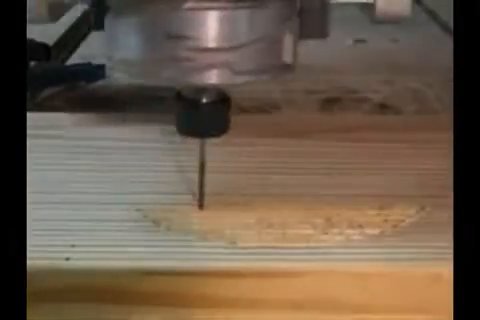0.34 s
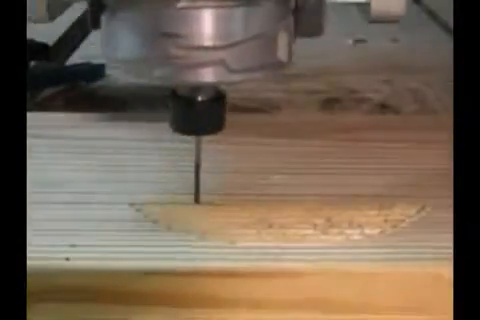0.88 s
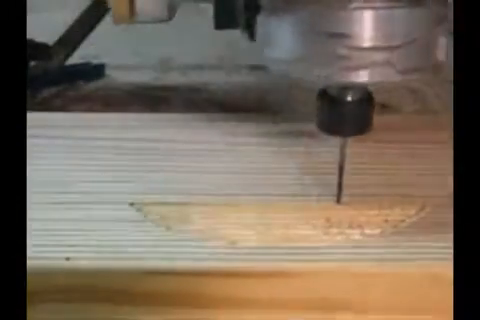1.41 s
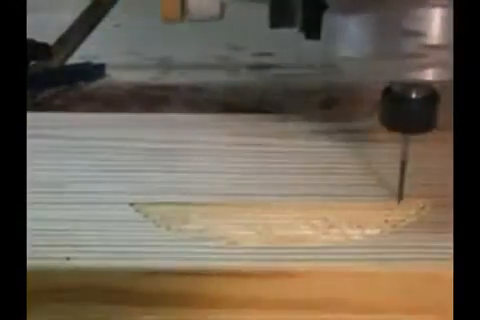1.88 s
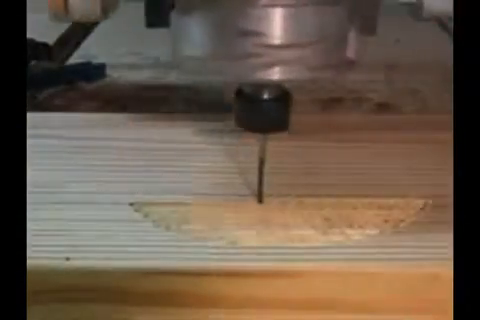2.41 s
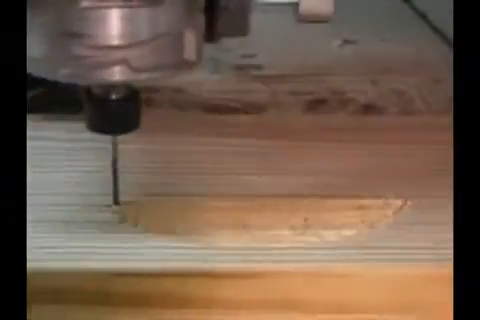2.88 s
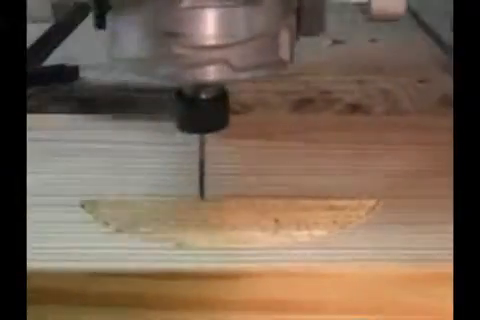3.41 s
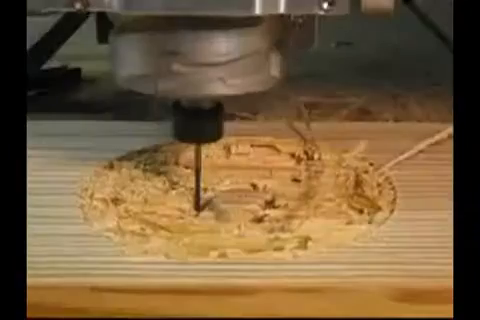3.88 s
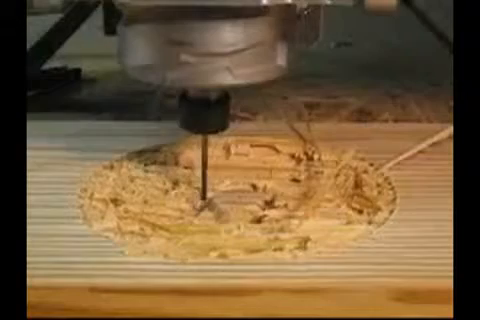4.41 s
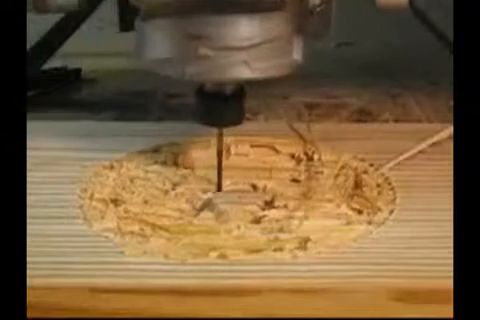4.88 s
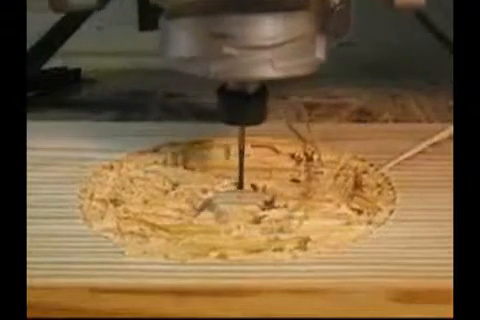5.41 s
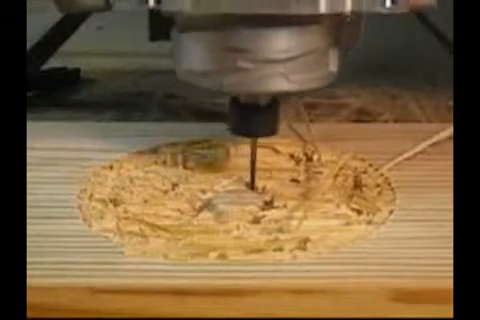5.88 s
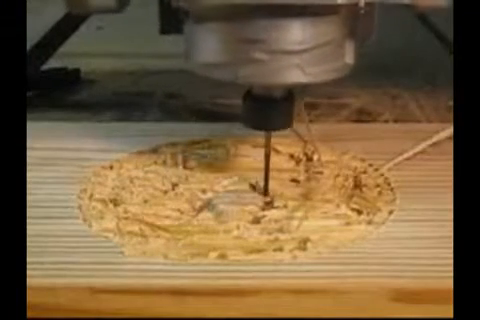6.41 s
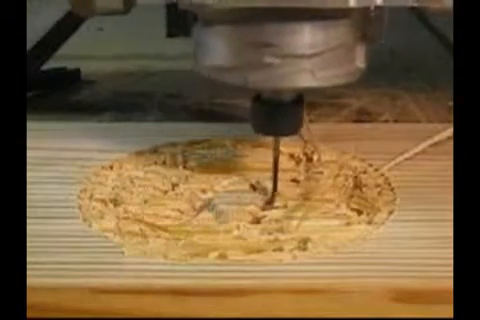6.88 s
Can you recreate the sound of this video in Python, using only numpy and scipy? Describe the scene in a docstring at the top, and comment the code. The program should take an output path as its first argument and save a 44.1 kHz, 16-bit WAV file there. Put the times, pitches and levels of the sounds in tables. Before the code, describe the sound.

High, airy motor whine close up, broken by a loud buzzing bite into wood and later another, before uneven rattling cuts and gliding motor tones.

```python
"""In a workshop, close to a stereo camera, a small router spindle whines over a wooden board.
The first pass runs mostly in free air, with two bursts of heavy bites, the second across the dissolve
and just after it. It dissolves into a later pass, in which the bit carves all the time and chatters.
Whine, rings and screech are sines on multiples (orders) of the shaft speed; fan, chips and bench are
shaped noise; the axis motors sing tones. The camera limits and clips softly."""
import sys
import numpy as np
from scipy import signal
from scipy.fft import rfft, irfft, next_fast_len
from scipy.io import wavfile
from scipy.ndimage import uniform_filter1d, minimum_filter1d, map_coordinates

SR = 44100
rng = np.random.default_rng(int(sys.argv[2]) if len(sys.argv) > 2 else 0)


def how_loud(loudness_db):
    """Turn decibels into a plain amplitude multiplier (0 dB gives 1, 20 dB gives 10)."""
    steps = np.asarray(loudness_db, float) / 20
    return 10 ** steps


def bounce(signal):
    """Save signal as a 16-bit WAV file at the path given by the first command-line argument."""
    frames = np.transpose(np.atleast_2d(signal))
    limited = np.clip(frames, -1, 1)
    pcm = np.round(limited * 32767).astype(np.int16)
    wavfile.write(sys.argv[1], SR, pcm)


N = 309141

# Start and end of the dissolve, in seconds.
DISSOLVE_S = (3.77, 3.9)
# Level of the motor sound over time; it sinks after loud cuts and creeps back. Each row: time in seconds, level
# in dB.
MOTOR_LOUDNESS = [(0, -1.1), (.97, -0.4), (1.02, -1.5), (1.3, -1), (1.6, -0.5), (2.1, -0.8), (2.4, -1),
                  (3.0, -0.84), (3.7, -0.5), (4.1, 1), (4.17, -3), (4.42, -3), (4.62, -5.5), (4.76, -2.5),
                  (5, -3.5), (5.3, -1), (5.8, -1.5), (6.0, -4), (6.08, -6), (6.17, -4.5), (6.25, -5.5),
                  (6.45, -5), (6.54, -8.5), (6.8, -3), (6.88, -6), (7.0, -5.5)]
# Whine of the spindle in either pass. Each row: shaft order, relative level in dB.
FIRST_WHINE_ORDERS = [(1, -37.0), (2, -35.0), (3, -40.0), (4, -44.0), (5, -42.0), (6, -56.0), (7, -48.0),
                      (9, -54.0), (10, -51.0), (11, -57.0), (12, -51.0), (14, -46.0), (15, -43.0),
                      (16, -46.0), (17, -41.0), (18, -47.0), (19, -40.0), (20, -50.0), (21, -38.0),
                      (22, -30.0), (23, -25.5), (24, -39.0), (25, -34.0), (26, -41.0), (28, -40.0),
                      (29, -41.0), (30, -40.0), (31, -44.0), (32, -35.0), (33, -47.0), (34, -56.0),
                      (35, -40.0), (36, -41.0), (37, -46.0), (38, -50.0), (39, -43.0), (40, -42.0),
                      (41, -53.0), (42, -50.0), (43, -47.0), (44, -46.0), (45, -43.0), (46, -55.0),
                      (47, -55.0), (48, -49.0), (49, -54.0), (50, -49.0), (51, -56.0), (52, -55.0)]
LATER_WHINE_ORDERS = [(1, -36.0), (2, -33.0), (4, -39.0), (5, -46), (6, -46), (7, -46), (8, -46), (9, -46),
                      (10, -53.0), (11, -46.0), (12, -47.0), (13, -49.0), (14, -46.0), (15, -47.0),
                      (17, -51.0), (18, -48.0), (19, -41.0), (20, -43.0), (21, -33.5), (22, -39.0),
                      (23, -29.0), (24, -33.0), (25, -37.0), (26, -37.0), (27, -36.0), (28, -37.0),
                      (29, -54.0), (30, -38.0), (31, -52.0), (32, -48.0), (33, -42.0), (34, -51.0),
                      (35, -50.0), (36, -54.0), (37, -42.0), (38, -52.0), (39, -44.0), (40, -52.0),
                      (42, -54.0), (44, -51.0), (45, -56.0), (46, -59.0), (47, -56.0), (48, -52.0),
                      (49, -58.0), (50, -57.0), (51, -58.0), (52, -57.0)]
# Tones of the axis drives. Each row: frequency in Hz, relative level in dB.
DRIVE_TONES = [(118.4, -56.5), (1003, -36.5), (1561, -38), (3235, -49), (3472, -38.5), (8748, -41),
               (12888, -55)]
# Colour of the fan rush in either pass. Each row: frequency in Hz, relative density in dB per Hz.
FIRST_FAN = [(150, -26), (350, -21), (480, -16), (700, -10), (1200, -8.5), (2000, -10.5), (3000, -10),
             (4300, -5), (5200, -5.5), (5800, 2), (6500, 1.5), (7500, 1.5), (8300, -5.5), (9500, -15),
             (12000, -21), (14500, -17.5), (15300, -78)]
LATER_FAN = [(150, -17), (350, -13), (480, -8), (700, -7), (1200, -3.5), (2000, -5), (3000, -7), (4300, -2),
             (5200, -1.5), (5800, 3.5), (6500, 3), (7500, 3), (8300, -4.5), (9500, -12), (12000, -16),
             (14500, -17), (15300, -14)]


def motor(first_hz, later_hz):
    """Both passes: shaft orders that sag under load, fan rush beating once a turn and drive tones."""
    loudness = how_loud(curves(MOTOR_LOUDNESS)[0])
    first, later = angle(first_hz), angle(later_hz)
    mix = curves([(DISSOLVE_S[0], 0), (DISSOLVE_S[1], 1)])[0]

    def sag(hz):
        return how_loud(-1.8 * (hz.max() - hz))  # dB lost for each Hz below the fastest turning

    # the low orders throb unevenly
    throb = stack([(2, -39), (3, -46)], first, 3, 16, 0.15, slip=3 * wobble(18))
    first_whine = sag(first_hz) * (stack(FIRST_WHINE_ORDERS, first, 1.6, 6, 0.25) + throb)
    later_whine = how_loud(1.0) * sag(later_hz) * stack(LATER_WHINE_ORDERS, later, 1.0, 12.0, 0.11)
    drives = stack(DRIVE_TONES, angle(np.ones(N)), 1.36, 8.9, 0.091)  # one turn a second: orders are Hz
    first_fan = how_loud(-16.5) * (1 + 0.067 * np.cos(first)) * rush(FIRST_FAN, patchy_db=1.32)
    later_fan = how_loud(-16) * (1 + 0.19 * np.cos(later)) * rush(LATER_FAN, patchy_db=1.4)
    first_pass = first_whine + np.sqrt(sag(first_hz)) * drives + first_fan
    later_pass = later_whine + how_loud(-3.5) * drives + later_fan
    return loudness * np.sqrt(1 - mix) * first_pass, loudness * np.sqrt(mix) * later_pass


# Torn wood fibres. Each row: frequency in Hz, relative density in dB per Hz.
CHIP_COLOUR = [(40, -30), (150, -19), (400, -18), (1200, -16), (2300, -7), (3200, -12), (4400, -13),
               (5700, -7), (6500, -9), (7500, 1), (8500, -13), (10000, -18), (14500, -28), (15400, -34)]


def bites(table, turn, rings, screech, rough_db, chips_db, beat, grip=1):
    """The flutes strike the wood every turn: board and bit ring, screech and torn fibres lie above."""
    *ring_sizes, screech_size = sizes(table, count=len(rings) + 1)
    ring = sum(size * stack(orders, turn, rough_db, 55, 0.27)
               for size, orders in zip(ring_sizes, rings))
    lines = how_loud(-5.0) * stack(screech, turn, rough_db + 0.5, 50, 0.26)
    chips_level = how_loud(chips_db + 0.51 * wobble(22)) * (1 + 0.084 * np.cos(turn))
    chips = chips_level * rush(CHIP_COLOUR, patchy_db=0.5)
    return grip * ring + screech_size * beat * (lines + chips)


# Heavy bites. Each row: start in seconds, length in seconds, levels in dB of the rings around orders
# 6, 7, 8, 10, 1-3, 17 and 21, level of the screech in dB, shaft sag in Hz.
HEAVY_BITES = [(.725, 0.024, -41, -31, -22, -23, -49, -40, -36, -20, 1),
               (.748, 0.027, -38, -34, -17, -16, -53, -34, -28, -13, 3.2),
               (0.774, 0.042, -30, -32, -14.5, -16, -34, -24, -30, -10, 4.8),
               (0.814, 0.03, -29, -32, -14, -17, -35, -22, -23, -10, 4),
               (0.851, 0.043, -35, -33, -15, -16, -35, -27, -25, -10, 4.5),
               (0.884, 0.041, -40, -38, -18, -18, -56, -30, -27, -9, 5.45),
               (.928, 0.025, -36, -30, -12, -25, -29, -25, -32, -8, 4.5),
               (.956, 0.023, -26, -20, -16.5, -31, -52, -22, -34, -10, 4),
               (.985, 0.092, -35, -28, -28, -35, -63, -44, -47, -33, 0.43),
               (1.085, 0.012, -22, -27, -23, -34, -54, -38, -36, -16, .4),
               (1.115, 0.27, -48, -39, -48, -53, -57, -50, -46, -29, 0.67),
               (3.801, .016, -19, -29, -26, -24, -28, -40, -34, -21, 3.9),
               (3.816, .074, -28, -40, -16.5, -20, -50, -34, -34, -10, 6.5),
               (3.909, 0.04, -25, -29, -17, -17, -33, -24, -31, -12.5, 5.2),
               (3.951, .028, -43, -32, -15, -21, -41, -32, -31, -8.5, 3.9),
               (3.979, 0.064, -37, -30, -14.5, -21.5, -34, -36, -28, -8.5, 1.77),
               (4.036, 0.033, -30, -22, -15, -28, -32, -17.5, -34, -7, 4.9),
               (4.066, .054, -23, -30, -30, -34, -37, -37, -42, -15.5, 4)]
# Orders that sound together, a group for each ring level. Each row of a group: order, relative dB.
HEAVY_RING_GROUPS = [
    [(5, -6), (6, 0)],
    [(7, 0)],
    [(8, 0), (9, -10)],
    [(10, 0), (11, -8), (12, -10)],
    [(1, 0), (2, -2), (3, 0)],
    [(14, -4), (17, 1.5)],
    [(13, -8), (15, -8), (16, -12), (18, -9), (19, -3), (20, -6), (21, 3), (22, -2)],
]
# Screech. Each row: shaft order, relative level in dB.
HEAVY_SCREECH = [(24, -14), (25, -29), (26, -1.5), (27, -4), (28, -2.5), (29, -7), (30, -10)]


def heavy_bites(turn):
    """Deep cuts ring on the low orders and screech, their rings shaken by the grain."""
    return bites(HEAVY_BITES, turn, HEAVY_RING_GROUPS, HEAVY_SCREECH,
                 rough_db=2.0, chips_db=1.0, beat=0.55, grip=grain())


# The bit lets go for an instant. Each row: time in seconds, gain at the deepest point in dB.
LETTING_GO = [(.746, -11), (.769, -14), (.814, -14), (0.847, -13), (.888, -6), (.927, -4), (3.9, -4),
              (3.942, -11), (4.09, -14)]


def grain():
    """Hard and soft grain of the wood shakes the rings, and now and then the bit lets go."""
    t = np.arange(N) / SR
    half_width_s = 0.0028  # where the dip in dB has shrunk to 1/e
    lapses_db = sum(db * np.exp(-((t - s) / half_width_s) ** 2) for s, db in LETTING_GO)
    return how_loud(0.74 * wobble(70) + lapses_db)


# Clean whistling inside heavy bites. Each row: start in seconds, length in seconds,
# level of order 27 in dB, level of order 28 in dB.
WHISTLES = [(.78, 0.028, -35, -34), (0.823, 0.037, -34, -25), (.875, 0.038, -27, -22),
            (0.927, 0.027, -28, -32), (3.825, 0.059, -26, -19), (3.907, 0.031, -18, -22),
            (3.978, 0.05, -9, -21), (4.04, 0.023, -22, -28)]


def whistle(turn):
    """Two neighbouring orders meet a sharp resonance of the bit and sound almost pure."""
    return sum(size * stack([(order, 0)], turn, 1.2, 30, 0.3)
               for size, order in zip(sizes(WHISTLES, count=2), (27, 28)))


# Shallow cuts. Each row: start in seconds, length in seconds, levels in dB of the rings around
# orders 5, 6, 8 and 9, level of the screech in dB, shaft sag in Hz (negative: it speeds up).
SHALLOW_CUTS = [(3.599, 0.2, -44, -37, -42, -50, -42, 1), (3.8, 0.12, -32, -22, -24, -25, -30, 0.5),
                (3.955, 0.071, -43, -37, -21, -17, -13, 1), (4.045, 0.037, -28, -23, -22, -38, -31, 0),
                (4.1, 0.0339, -28, -21, -29, -42, -46, 0), (4.148, 0.019, -25, -25, -27, -29, -44, -0.5),
                (4.205, 0.066, -30, -27, -32, -41, -50, 0), (4.29, 0.022, -34, -37, -24, -31, -42, 0.5),
                (4.35, 0.055, -31, -32, -33, -50, -49, -0.5), (4.402, 0.03, -32, -31, -21.5, -27, -24, 3),
                (4.463, 0.03, -31, -27, -19.5, -30, -19, 3.5),
                (4.496, 0.048, -34, -30, -26.5, -34, -23, 2.5), (4.56, 0.02, -42, -33, -29, -38, -26, 3),
                (4.589, 0.066, -40, -35, -49, -44, -47, 0), (4.68, 0.096, -53, -32.5, -37, -52, -46, 0),
                (4.76, 0.048, -34, -29, -37, -34, -42, 0), (4.8, 0.168, -31, -30, -37, -32, -39, 0.5),
                (4.971, 0.21, -40, -29.5, -33, -34, -41, 0), (5.17, 0.22, -41, -31, -32.5, -34, -46, -0.5),
                (5.4, 0.2, -51, -27.5, -52, -62, -35, 0), (5.62, 0.074, -45.5, -45, -62, -61, -48, -0.5),
                (5.72, 0.23, -39, -44.5, -45, -38.5, -33, 0),
                (5.925, 0.046, -53, -38, -42, -31, -23.5, 0.5),
                (6.011, 0.027, -34, -19, -29, -40, -25.5, 2),
                (6.034, 0.027, -33, -18, -37, -42, -18.5, 2.5), (6.155, 0.03, -44, -32, -34.5, -42, -32, 0),
                (6.185, 0.05, -26, -22.5, -29, -34, -23, 1.5), (6.24, 0.12, -27, -22, -34, -39.5, -49, 0.5),
                (6.36, 0.055, -25, -22.5, -42, -44.5, -44, 0), (6.411, 0.097, -25, -19, -34, -45, -31, 0),
                (6.551, 0.12, -46, -41, -49.5, -60, -48, 0.5),
                (6.701, 0.094, -47, -36.5, -43.5, -51.5, -44, -0.5),
                (6.781, 0.05, -38, -22, -17.5, -32, -17.5, 3), (6.83, 0.04, -24, -18, -24, -23, -15.5, 0.5),
                (6.912, 0.13, -27, -21.5, -29.5, -36, -33, 2.5)]
# Orders that sound together, a group for each ring level. Each row of a group: order, relative dB.
SHALLOW_RING_GROUPS = [
    [(5, 0)],
    [(6, 0), (11, -17), (12, -18), (13, -21), (17, -17), (18, -18)],
    [(7, -9), (8, 0), (10, -10), (16, -10)],
    [(9, 0)],
]
# Screech. Each row: shaft order, relative level in dB.
SHALLOW_SCREECH = [(13, -13), (14, -12), (15, -13), (16, -11), (17, -11), (18, -13), (21, -11), (23, -7),
                   (24, -4), (25, -4), (26, 0), (27, -2), (28, -10), (29, -9), (30, -10)]


def carving(turn, slip):
    """Shallow cuts ring and screech; the depth of cut swells with the chatter beat."""
    swing = sizes(CHATTER_SPELLS, count=2)[1] / (sizes(SHALLOW_CUTS, count=2)[1] + 1e-4)
    throb = 1 + np.minimum(swing, 0.8) * np.cos(slip)
    return bites(SHALLOW_CUTS, turn, SHALLOW_RING_GROUPS, SHALLOW_SCREECH,
                 rough_db=1.9, chips_db=-3, beat=throb)


# The third shaft order while carving. Each row: time in seconds, level in dB.
THIRD_ORDER_LEVEL = [(3.74, -80), (3.82, -28), (4.1, -35.5), (4.4, -35), (4.65, -42.5), (4.85, -35.5),
                     (5.2, -49), (5.7, -42.5), (7, -50)]


def third_order(turn):
    """A tone at three times the shaft speed rises and sinks while carving."""
    return how_loud(curves(THIRD_ORDER_LEVEL)[0]) * stack([(3, 0)], turn, 1.5, 20, 0.15)


# Spells of chatter. Each row: start in seconds, length in seconds, level of the low board ring in dB,
# of the board ring in dB and of the bit ring in dB, distance below the shaft orders in Hz.
CHATTER_SPELLS = [(3.797, 0.16, -27, -23.5, -31, 53), (3.975, 0.13, -42, -28, -27, 47),
                  (4.096, 0.1, -34, -29, -43, 44), (4.269, 0.088, -36, -28.5, -37, 43),
                  (4.355, 0.12, -42, -30.5, -29.5, 46), (4.543, 0.09, -34, -41, -31.5, 46),
                  (4.748, .05, -40, -46, -32, 50), (4.798, 0.09, -30, -29, -27.5, 52),
                  (4.893, .07, -34, -33, -26, 46), (4.959, 0.043, -44, -36, -39, 48),
                  (5.413, 0.21, -44, -35, -57, 45), (5.544, 0.18, -46.5, -32.5, -38, 45),
                  (5.721, 0.067, -38, -39.5, -30, 48), (5.785, 0.15, -26, -31, -27.5, 48),
                  (5.923, 0.074, -30, -38.5, -24.5, 45), (6.014, 0.062, -34, -27, -32, 40),
                  (6.179, 0.057, -26, -19, -35, 36), (6.239, 0.085, -32, -25, -42, 37),
                  (6.315, 0.09, -48, -34, -50, 38), (6.405, 0.13, -41, -30, -42, 38),
                  (6.704, 0.1, -44, -36, -40, 46), (6.779, 0.12, -40, -33, -33.5, 48),
                  (6.906, .12, -27, -23, -34, 46)]
# Orders that sound together, a group for each ring level. Each row of a group: order, relative dB.
CHATTER_RING_GROUPS = [
    [(4, -15), (5, -4)],
    [(6, 0)],
    [(7, -5), (8, 1), (9, -9.5), (10, -15)],
]
# Second harmonic of the chatter. Each row: shaft order it lies below, relative level in dB.
CHATTER_OVERTONE = [(13, -15.5), (14, -28), (15, -2), (16, -3.5), (17, -13), (18, -12), (21, -26), (24, 0),
                    (26, -17), (29, -23)]


def chatter(turn, slip):
    """The bit swings at its own frequency: lines below the orders beat with them.

    The overtone grows with the square of the swing."""
    ring_sizes = sizes(CHATTER_SPELLS, count=3)
    ring = sum(size * stack(orders, turn, 3, 55, 0.2, slip)
               for size, orders in zip(ring_sizes, CHATTER_RING_GROUPS))
    overtone = stack(CHATTER_OVERTONE, turn, 2.1, 30, 0.4, 2 * slip)
    return ring + how_loud(20.5) * ring_sizes[2] ** 2 * overtone


def slipping():
    """Phase by which the chatter trails the orders; every spell starts in a trough of the beat."""
    t = np.arange(N) / SR
    starts, hz = np.array(CHATTER_SPELLS)[:, [0, -1]].T
    spell = np.maximum(np.searchsorted(starts, t) - 1, 0)
    return np.pi + 2 * np.pi * hz[spell] * (t - starts[spell])


# Glides of the feed motors while carving. Each row: start in seconds, end in seconds,
# first pitch in Hz, last pitch in Hz, level at the height of the swell in dB.
FEED_GLIDES = [(4.1, 4.17, 129.9, 109, -42), (4.17, 4.32, 522, 475.2, -35.5), (4.32, 4.42, 434, 533.6, -31),
               (4.52, 4.8, 121.1, 121.8, -48.5), (4.63, 4.79, 533, 429.7, -42), (4.8, 4.92, 219, 183, -45),
               (4.79, 4.9, 497, 525.7, -46), (4.92, 5.05, 431, 456.3, -53), (5.02, 5.28, 156, 100.2, -48),
               (5.15, 5.27, 448, 350, -39), (5.28, 5.37, 261.8, 222.4, -46), (5.33, 5.55, 424.5, 415, -42),
               (5.38, 5.55, 165, 124.5, -50), (5.58, 5.7, 414, 436.7, -45), (5.6, 5.75, 190, 233, -42),
               (5.75, 5.9, 229, 191, -45), (5.74, 5.83, 491, 540, -42), (5.83, 5.92, 508, 431.7, -39),
               (5.93, 6.0, 469, 510, -46), (6.1, 6.22, 120.4, 152.3, -51), (6.3, 6.4, 143, 156, -53),
               (6.54, 6.65, 519, 460, -51), (6.6, 6.75, 124.6, 114.3, -45.5), (6.65, 6.8, 739, 630.4, -40),
               (6.72, 6.82, 505, 423, -42), (6.78, 6.92, 140, 155, -51.5), (6.85, 6.98, 428, 532, -38.5)]


def feed():
    """An axis motor sings a rough tone that glides with the feed speed, swelling and fading."""
    size, pitch = np.zeros((2, 2, N))
    for start, end, from_hz, to_hz, db in FEED_GLIDES:
        span = slice(int(start * SR), int(end * SR))
        voice = int(from_hz > 300)  # low and high glides may sound together
        count = len(size[voice, span])
        size[voice, span] = how_loud(db) * np.hanning(count) ** 0.5
        pitch[voice, span] = np.linspace(from_hz, to_hz, count)
    return sum(size[voice] * stack([(1, 0)], angle(pitch[voice]), 4, 35, 0.4) for voice in range(2))


# Colour of the bench rumble. Each row: frequency in Hz, relative density in dB per Hz.
BENCH_COLOUR = [(15, -4), (30, -8), (70, -9.5), (120, -8.5), (200, -8), (300, -15.5)]


def bench():
    """Low rumble of the bench, lumpy, rising with the motor and shaken by heavy bites."""
    calm_db = curves([(DISSOLVE_S[0], 0), (DISSOLVE_S[1], -19)])[0]  # calmer in the later pass
    rest = how_loud(-44.5 + calm_db + curves(MOTOR_LOUDNESS)[0] + 1.3 * wobble(4.82))
    shaking = how_loud(-16) * sizes(HEAVY_BITES, count=8)[-1]  # follows the screech level
    return (rest + shaking) * rush(BENCH_COLOUR, patchy_db=3.0)


def shaft(free_hz, rows):
    """Each bite pulls the shaft from its free speed towards its sag, more slowly than it sounds."""
    slowing_s = 0.0377
    sags = [(row[0], row[1], row[-1]) for row in rows]
    return free_hz - spells(sags, slowing_s, slowing_s)[0]


def sizes(rows, count):
    """Amplitude over time of the first count dB columns of a table of bites or spells."""
    levels = [(s, length, *how_loud(np.array(rest[:count]))) for s, length, *rest in rows]
    return spells(levels, rise_s=0.014, fall_s=0.013)


def spells(rows, rise_s, fall_s):
    """Rows (s, length s, value, ..): each value rises, holds and falls; overlaps add."""
    out, t = np.zeros((len(rows[0]) - 2, N)), np.arange(N) / SR
    for start, length, *values in rows:
        span = slice(int(start * SR), int((start + length + fall_s) * SR))
        rise = (t[span] - start) / rise_s
        fall = 1 - (t[span] - start - length) / fall_s
        out[:, span] += np.outer(values, np.clip(np.minimum(rise, fall), 0, 1))
    return out


def stack(orders, turn, waver_db, rate, spread, slip=0):
    """Sines on shaft orders; each wavers on its own, its phase apart at the two microphone ports."""
    out = np.zeros((2, N))
    for order, db in orders:
        side = spread * rng.choice([-1, 1]) * rng.uniform(0.6, 1.3)  # radians
        phase = order * turn + order ** 2 - slip + waver_db / 8 * wobble(rate)
        size = np.sqrt(2) * how_loud(db + waver_db * wobble(rate))
        out += size * np.sin(phase + side * np.array([[1], [-1]]))
    return out


# Likeness of the two microphone ports in noise. Each row: frequency in Hz, left-right correlation.
PORT_LIKENESS = [(25, 0.72), (60, 0.74), (130, 0.75), (200, 0.99), (380, 0.96), (950, 0.99), (2380, 0.87),
                 (5980, 0.73), (15000, 0.31)]


def rush(spectrum, patchy_db):
    """Stereo noise of rms 1 with patches of random gain in time and frequency."""
    z = signal.stft(rng.standard_normal((2, N)), nperseg=512)[2]
    field = uniform_filter1d(rng.standard_normal(z.shape[1:]), size=5, axis=0)
    field = uniform_filter1d(field, size=12, axis=1)
    pair = signal.istft(z * how_loud(patchy_db * unit(field)), nperseg=512)[1][:, :N]

    def mid_side(hz):
        turn = np.arccos(np.clip(along(PORT_LIKENESS, hz), -1, 1)) / 2
        return how_loud(along(spectrum, hz)) * [np.cos(turn), np.sin(turn)]

    mid, side = filtered(pair, mid_side)
    return unit(np.array([mid + side, mid - side]))


def unit(x):
    """Scales to rms 1."""
    return x / np.sqrt(np.mean(x ** 2) + 1e-20)


def along(points, hz):
    """Reads (Hz, value) points on a log axis."""
    f, v = np.transpose(points)
    return np.interp(np.log(hz + 1), np.log(f + 1), v)


def curves(rows):
    """One value per sample for each column after the time."""
    s, *cols = np.transpose(rows)
    return [np.interp(np.arange(N) / SR, s, c) for c in cols]


def wobble(rate):
    """A random curve of straight lines between knots, rate knots a second."""
    knots = rng.standard_normal(int(N * rate / SR) + 4)
    return map_coordinates(knots, [np.arange(N) * rate / SR], order=1)


def filtered(x, response):
    """x times a response of frequency."""
    m = next_fast_len(N + 8192)
    return irfft(rfft(x, m) * response(np.fft.rfftfreq(m, 1 / SR)), m)[..., :N]


def angle(hz):
    """Running phase in radians of a frequency curve."""
    return 2 * np.pi * np.cumsum(hz) / SR


def limited(x, top):
    """The camera's limiter lowers the gain for some 7 ms either side of a loud peak."""
    need = np.minimum(1, top / (np.abs(x).max(axis=0) + 1e-9))
    gain = uniform_filter1d(minimum_filter1d(need, size=300), size=300)
    return gain * x


def scene():
    """Both passes, each through the limiter on its own, over the bench."""
    first_hz = shaft(279.55, HEAVY_BITES)  # free speed in turns a second
    later_hz = shaft(280.25, SHALLOW_CUTS)
    first_turn, later_turn = angle(first_hz), angle(later_hz)
    slip = slipping()
    first, later = motor(first_hz, later_hz)
    first += heavy_bites(first_turn) + whistle(first_turn)
    later += carving(later_turn, slip) + third_order(later_turn)
    later += feed() + chatter(later_turn, slip)
    return limited(first, top=1.0) + limited(later, top=0.81) + bench()


# Lean of the microphone ports. Each row: frequency in Hz, left minus right in dB.
PORT_LEAN = [(60, 4), (99, -2.5), (160, 2), (270, 0), (450, -0.5), (740, 1), (1220, 0.5), (2010, -1),
             (3330, -2), (5500, 2.5), (9080, -2), (15000, 5)]


def ports(x):
    """The two microphone ports lean left or right by band."""
    return filtered(x, lambda hz: how_loud(along(PORT_LEAN, hz) / 2 * np.array([[1], [-1]])))


def low_pass(x):
    """Removes everything above the highest recorded frequency."""
    return signal.sosfilt(signal.butter(12, 15600, fs=SR, output="sos"), x)


def record(dry):
    """The camera hears through its two ports and clips peaks softly."""
    x = ports(dry)
    mix = x / (1 + np.abs(x) ** 6) ** (1 / 6)
    return low_pass(mix)


dry = scene()
out = record(dry)
bounce(out)
```